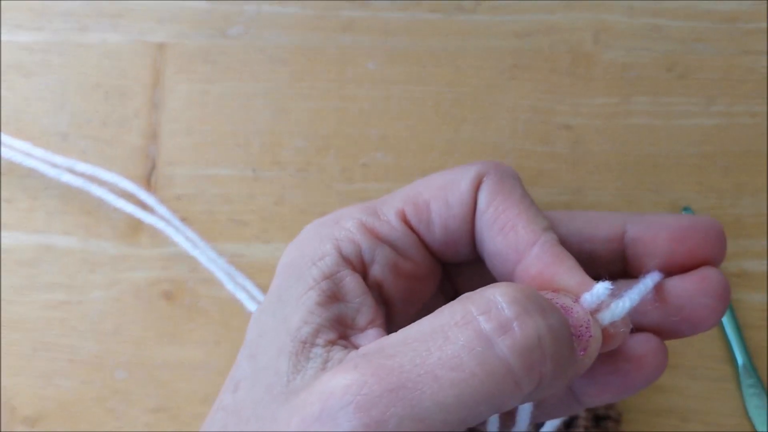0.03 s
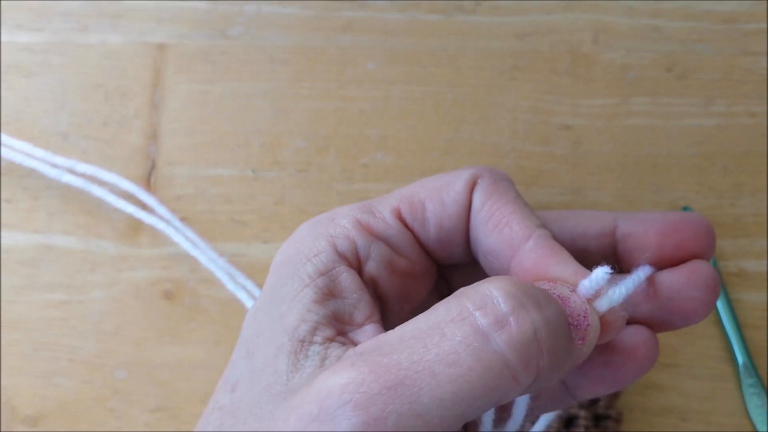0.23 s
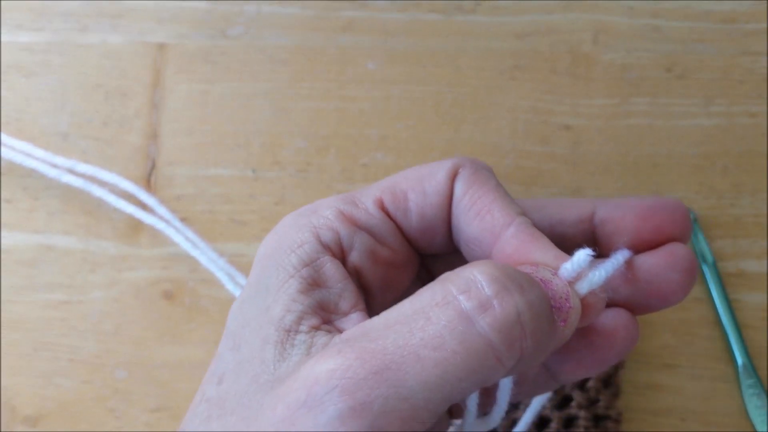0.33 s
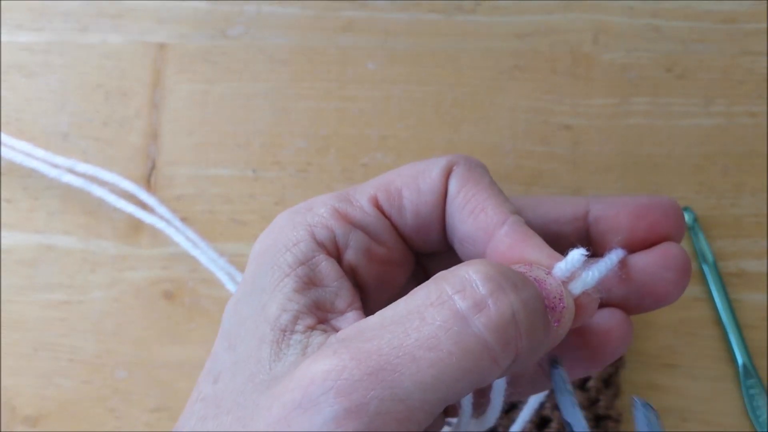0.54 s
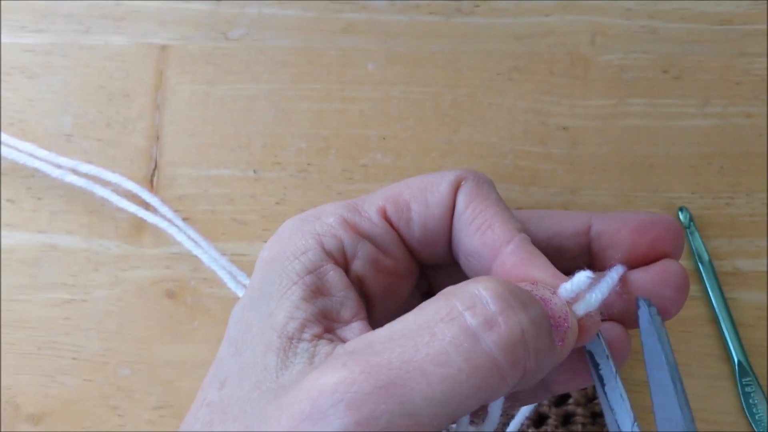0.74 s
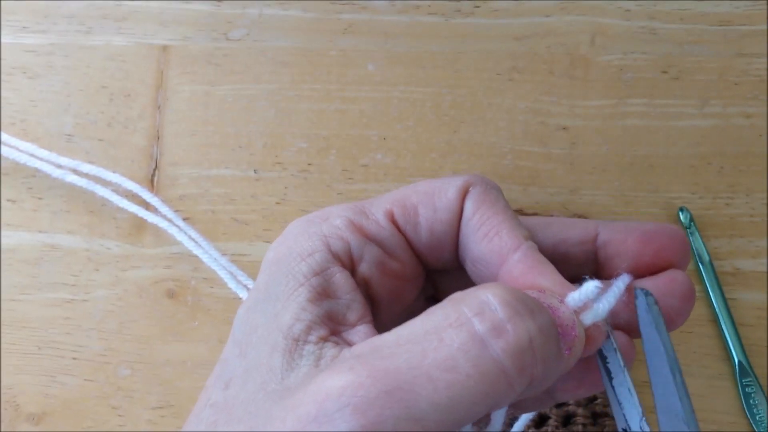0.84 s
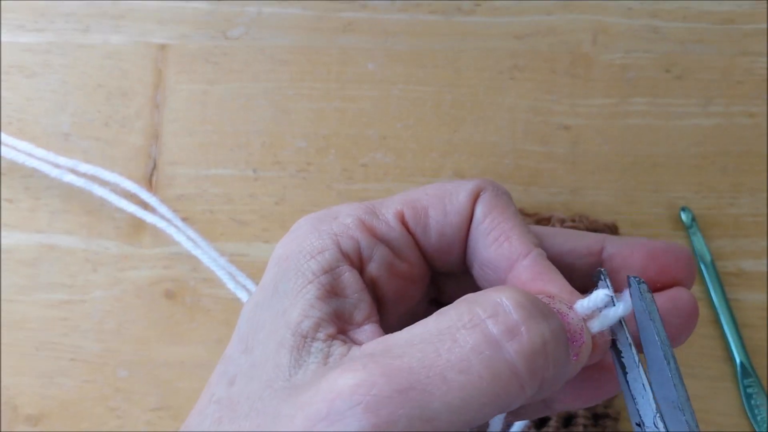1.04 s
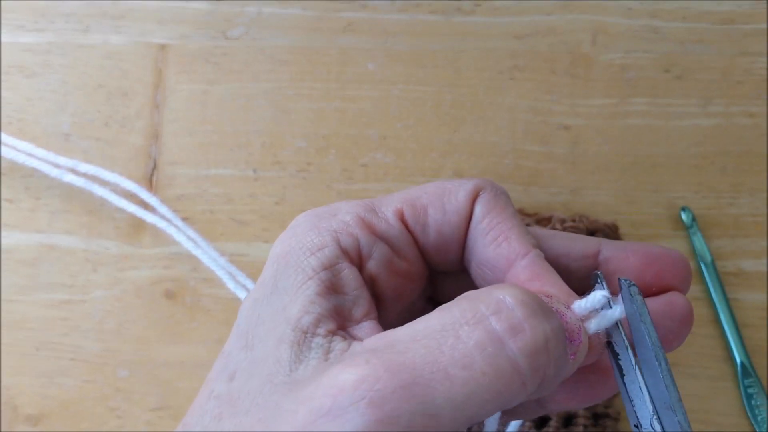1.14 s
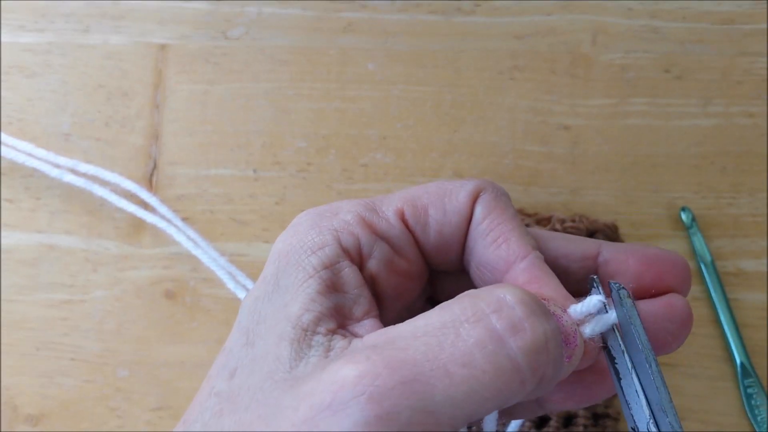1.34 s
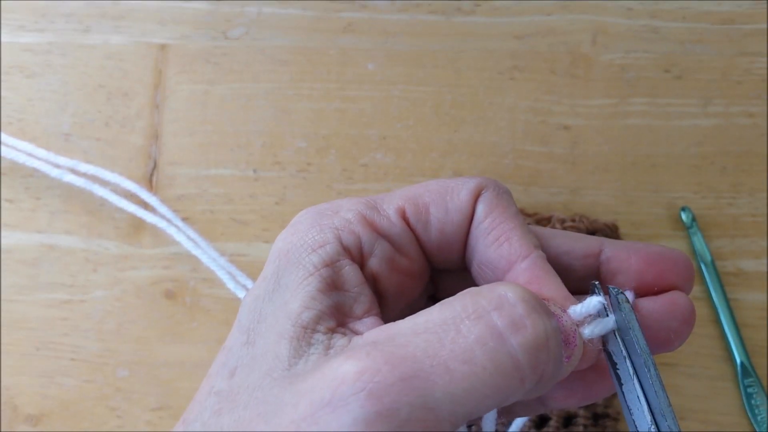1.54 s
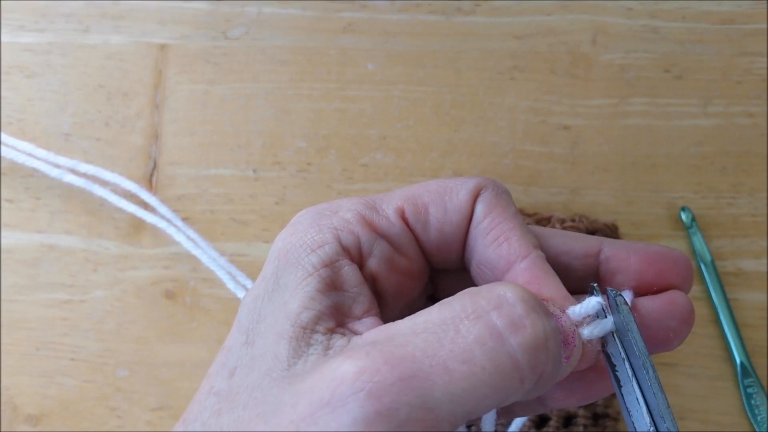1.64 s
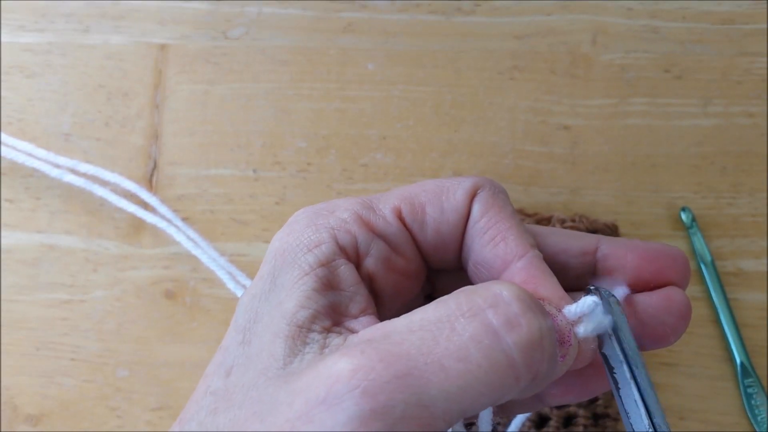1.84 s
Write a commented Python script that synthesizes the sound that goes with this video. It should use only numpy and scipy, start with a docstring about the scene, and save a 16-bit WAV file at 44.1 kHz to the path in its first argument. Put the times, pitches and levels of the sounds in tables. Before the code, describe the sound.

Scissors lifted from a wooden table: a soft rub and tiny tick, then a loud woody, metallic knock at 0.2 seconds, ringing briefly in a small room. A bright blade tick follows at 0.4, a short steely slide at 0.5. Quiet until a small click at 1.47, a barely audible scrape at 1.76 and a faint dry yarn crunch at 1.88. Low hum and faint hiss throughout, close microphone.

```python
"""In a small, quiet room, close to the microphone, steel scissors are taken up from a wooden table.
They knock once: broadband contacts excite decaying modes of table and blades, and the diffuse room.
The blades slide open (stick-slip noise), tick (echoed impulses) and start to bite into yarn (a noise pulse).
A low room hum and a faint hiss, both filtered noise, run throughout."""
import sys
import numpy as np
from scipy import signal
from scipy.fft import rfft, irfft
from scipy.io import wavfile

SR = 44100
rng = np.random.default_rng(int(sys.argv[2]) if len(sys.argv) > 2 else 0)


def unload_audio(sound):
    """Save the sound as a 16-bit wav file, at the path given as the first command line argument."""
    columns = np.transpose(np.atleast_2d(sound))
    # keep every value between -1 and 1, then stretch to whole-number steps
    steps = np.round(np.clip(columns, -1, 1) * 32767)
    wavfile.write(sys.argv[1], SR, steps.astype(np.int16))


N = 83790  # samples, 1.9 s


def undb(db):
    """Amplitude ratio of a level in decibels."""
    return 10 ** (np.asarray(db) / 20)


def gains(points):
    """Spectral envelope: gain at each FFT bin, interpolated in dB over log frequency."""
    hz, db = np.array(points, float).T
    bin_hz = np.arange(N + 1) * SR / (2 * N)
    return undb(np.interp(np.log(bin_hz + 1), np.log(hz), db))


def colour(x, gain):
    """Minimum-phase filtering: folding the cepstrum makes a gain curve causal."""
    cepstrum = irfft(np.log(gain))
    cepstrum[1:N] *= 2
    cepstrum[N + 1:] = 0
    response = np.exp(rfft(cepstrum))
    return irfft(rfft(x, 2 * N) * response)[..., :N]


def shaped(x, points):
    """Source-filter principle: colour a sound, keeping the power that white noise would have."""
    gain = gains(points)
    return colour(x, gain / np.sqrt(np.mean(gain ** 2)))


def convolve(x, response):
    """Linear superposition: each sample of the sound launches a copy of the response."""
    return signal.fftconvolve(np.atleast_2d(x), response, axes=-1)[:, :N]


def diffuse(wide_hz):
    """Diffuse-field coherence: stereo noise, alike in the bass and unrelated well above wide_hz."""
    hz = np.fft.rfftfreq(N, 1 / SR)
    alike = 1 / (1 + (hz / wide_hz) ** 4)
    mid, side = rfft(rng.standard_normal((2, N)))
    mid = mid * np.sqrt((1 + alike) / 2)
    side = side * np.sqrt((1 - alike) / 2)
    return irfft(np.array([mid + side, mid - side]), N)


def pan(db):
    """Interchannel level difference: gains that set left minus right to db."""
    return undb(np.array([[db], [-db]]) / 2)


def fade(t60, rise_s):
    """Exponential decay by 60 dB in t60 seconds, after an exponential rise."""
    t = np.arange(N) / SR
    return (1 - np.exp(-t / rise_s)) * np.exp(-np.log(1000) * t / t60)


def room(t60, treble_t60):
    """Diffuse reverberation: decaying noise of unit energy, split at 3 kHz into two decay times."""
    wide_hz, rise_s = 790, 0.0013
    noise = diffuse(wide_hz)
    low = signal.sosfiltfilt(signal.butter(2, 3000, fs=SR, output="sos"), noise)
    tail = low * fade(t60, rise_s) + (noise - low) * fade(treble_t60, rise_s)
    return tail / np.sqrt(np.sum(tail ** 2) / 2)


def impulses(rows, start=0):
    """Ideal impulsive excitation: one sample for each (s, dB) row."""
    out = np.zeros(N)
    for s, db in rows:
        out[int(np.clip((start + s) * SR, 0, N - 1))] += undb(db)
    return out


# left minus right level of the scissors: frequency_hz, difference_db
SCISSORS_LEAN = [(100, 6.5), (400, -0.5), (1300, 1), (2400, 2), (4400, 0.5), (7000, 10.5), (9500, 3),
                 (14000, -9.5)]


def leaning(x):
    """Frequency-dependent level difference: mostly louder left, chiefly near 7 kHz; the very top leans right."""
    gain = np.sqrt(gains(SCISSORS_LEAN))  # half the difference on each side
    return np.array([colour(x[0], gain), colour(x[1], 1 / gain)])


def ports(x):
    """Interchannel time difference: a sound from the left reaches the right microphone later."""
    lag_s = 0.00023
    t = np.arange(N) / SR
    return np.array([x, np.interp(t - lag_s, t, x)])


# spectrum of the room hum: frequency_hz, relative_db_per_hz
HUM_SPECTRUM = [(25, -34), (42, -30), (55, 1.5), (70, -9.5), (90, 5.5), (130, -3.5), (185, -2.5),
                (225, -10), (280, 0.5), (365, -1), (450, -10.5), (600, -22), (1200, -21), (2000, -33.5),
                (4000, -28), (16000, -30.5)]
# level of the hum over time, added to HUM_DB: time_s, level_db
HUM_COURSE = [(0, 3.5), (.4, 3.5), (.75, 4), (.9, 1), (1.2, 2), (1.45, 0.5), (1.6, -2.5), (1.72, 2),
              (1.9, 3)]
# spectrum of the hiss: frequency_hz, relative_db_per_hz
HISS_SPECTRUM = [(500, 9), (3000, -3.5), (6000, -5), (9300, 0.5), (9750, -3.5), (10000, 8.5), (10300, -1),
                 (13000, -4), (16000, -2)]
# level of the hiss over time, added to HISS_DB: time_s, level_db
HISS_COURSE = [(0, -0.5), (.2, 2.5), (.36, 6), (.62, 1.5), (.9, 0.5), (1.43, 0), (1.62, -1), (1.8, 0)]
HUM_DB, HUM_PAN_DB, HUM_WIDE_HZ, HUM_WAVER_DB = -60, 3, 1130, 0.5
HISS_DB, HISS_PAN_DB = -65.5, -5


def background():
    """Stationary filtered noise, slowly modulated: a wavering low room hum under faint hiss."""
    t = np.arange(N) / SR
    waver = np.interp(t, np.linspace(0, t[-1], 40), rng.standard_normal(40))
    hum_db = HUM_DB + np.interp(t, *np.array(HUM_COURSE).T) + HUM_WAVER_DB * waver
    hum = shaped(diffuse(HUM_WIDE_HZ), HUM_SPECTRUM) * undb(hum_db) * pan(HUM_PAN_DB)
    hiss_db = HISS_DB + np.interp(t, *np.array(HISS_COURSE).T)
    hiss = shaped(rng.standard_normal((2, N)), HISS_SPECTRUM) * undb(hiss_db) * pan(HISS_PAN_DB)
    return hum + hiss


def brush():
    """Resonance excited by noise: a soft, hollow rub just before the knock."""
    peak_s, length_s, level_db, pitch_hz, width_hz = .162, .025, -65, 750, 130
    t = np.arange(N) / SR
    resonance = signal.iirpeak(pitch_hz, pitch_hz / width_hz, fs=SR)
    band = signal.lfilter(*resonance, rng.standard_normal(N))
    swell = np.exp(-((t - peak_s) / length_s) ** 2)
    return band / np.std(band) * undb(level_db) * swell


# light ticks of the blades: start_s, level_db, room_db (relative to the tick)
BLADE_TICKS = [(0.1948, -30, -4), (0.3993, -27.5, -10), (1.468, -27.5, -3)]
# spectrum of a tick: frequency_hz, relative_db
TICK_SPECTRUM = [(1000, -32), (3000, -19), (6300, -21), (7900, -2), (9200, 1), (11000, -11.5), (16000, -26)]
TICK_T60_S, TABLE_ECHO_S, TABLE_ECHO_DB = 0.16, 0.0018, -10


def click(rows):
    """Image source: each impulse is followed by its reflection in the table top."""
    echo = undb(TABLE_ECHO_DB) * impulses(rows, TABLE_ECHO_S)
    return shaped(impulses(rows) + echo, TICK_SPECTRUM)


def ticks():
    """Direct and reverberant field: small bright clicks, each with its own share of room."""
    direct = click([(s, db) for s, db, room_db in BLADE_TICKS])
    sent = click([(s, db + room_db) for s, db, room_db in BLADE_TICKS])
    return leaning(direct + convolve(sent, room(TICK_T60_S, TICK_T60_S)))


# spectrum of the wooden thump: frequency_hz, relative_db
THUMP_SPECTRUM = [(40, -29), (110, -4), (250, -9), (700, 5.5), (1100, -6.5), (2000, -41), (5000, -44),
                  (16000, -15)]
# contacts (first touch, blow, rattle): start_s (from the knock), level_db (added to CRACK_DB)
KNOCK_CONTACTS = [(-0.0020, -13), (0.0001, -23), (0.0007, -0.5), (0.0160, -9)]
# spectrum of a contact: frequency_hz, relative_db
CRACK_SPECTRUM = [(100, -20), (300, -20), (700, -21), (1400, 6), (1900, -16), (2280, 7), (2800, -26),
                  (3700, 2.5), (4400, 2), (5100, -3.5), (6100, 5.5), (7800, 2.5), (8800, -11), (9600, 2),
                  (11500, -21.5), (16000, -47)]
# modes of table and scissors: pitch_hz, level_db (added to RING_DB), t60_s (before late damping)
RING_MODES = [(193.8, -34.5, 0.33), (248.6, -22.5, .3), (402.2, -30.5, 0.24), (511.4, -42, 0.37),
              (537, -29, 0.2), (643, -44, 0.16), (726, -30, 0.18), (1157, -42.5, 0.36), (1290, -36, 0.24),
              (1460, -37, 0.32), (1605, -39, 0.23), (1781, -38, 0.32), (2294, -20, 0.19), (3558, -32, 0.22),
              (3660, -27, 0.12)]
# spectrum of the knock as the room returns it: frequency_hz, relative_db
KNOCK_ROOM_SPECTRUM = [(40, -62), (120, -9), (200, -8), (400, -1.5), (700, -2), (1000, -3.5), (1450, 1.5),
                       (1780, -1), (1950, -13.5), (2300, 5), (2800, -9), (3100, -5.5), (3280, -14),
                       (3600, 1.5), (4200, -6.5), (5200, -12), (6300, -8), (8000, -17), (9600, -16.5),
                       (11500, -24), (16000, -47)]
KNOCK_S, THUMP_DB = 0.208, -4
CRACK_DB, CRACK_PAN_DB, CRACK_T60_S, CRACK_RISE_S, CRACK_WIDE_HZ = -1, 5, 0.0086, .0001, 1170
RING_DB, RING_RISE_S = 2, 0.025
BOOM_HZ, BOOM_DB, BOOM_T60_S, BOOM_RISE_S = 89.2, -26.5, 0.47, 0.36
# decay times before late damping
KNOCK_ROOM_DB, KNOCK_T60_S, KNOCK_TREBLE_T60_S = 3, 0.32, 0.29
DAMPED_AFTER_S, DAMP_STEEPNESS = 0.22, 6


def knock():
    """Impact and modal decay: wood thumps, steel cracks, both ring on; a low room resonance builds up."""
    t = np.arange(N) / SR
    blow = impulses([(KNOCK_S, 0)])
    thump = ports(shaped(blow, THUMP_SPECTRUM)) * undb(THUMP_DB)

    # the contacts add in power; noise gives each sample its sign
    burst = fade(CRACK_T60_S, CRACK_RISE_S) ** 2
    burst = np.atleast_2d(burst / burst.sum())
    power = np.abs(convolve(impulses(KNOCK_CONTACTS, KNOCK_S) ** 2, burst))
    crack = shaped(np.sqrt(power) * np.sign(diffuse(CRACK_WIDE_HZ)), CRACK_SPECTRUM)
    crack = crack * undb(CRACK_DB) * pan(CRACK_PAN_DB)

    ring = np.zeros(N)
    for hz, db, t60 in RING_MODES:
        ring += undb(RING_DB + db) * np.sin(2 * np.pi * hz * t) * fade(t60, RING_RISE_S)
    boom = undb(BOOM_DB) * np.sin(2 * np.pi * BOOM_HZ * t) * fade(BOOM_T60_S, BOOM_RISE_S)
    tail = shaped(room(KNOCK_T60_S, KNOCK_TREBLE_T60_S), KNOCK_ROOM_SPECTRUM) * undb(KNOCK_ROOM_DB)

    # ring and room tail die away faster towards their end
    damped = 1 / np.sqrt(1 + (t / DAMPED_AFTER_S) ** DAMP_STEEPNESS)
    response = (tail + ports(ring)) * damped + ports(boom)
    return thump + crack + leaning(convolve(blow, response))


# blades sliding over each other: peak_s, level_db, rise_s, fall_s
BLADE_SLIDES = [(0.499, -61, 0.0097, 0.03), (0.5211, -35, 0.0024, .0022), (1.760, -66.5, 0.0068, 0.018)]
# spectrum of the sliding blades: frequency_hz, relative_db
BLADE_SPECTRUM = [(1000, -28), (2200, -42), (3150, -4), (4200, -13), (5150, 2), (6300, -11.5), (7200, 4),
                  (8200, 0), (9200, -2.5), (10500, -4), (13000, -17), (16000, -11)]
# spectrum of the slide sent to the room: frequency_hz, relative_db
BLADE_ROOM_SPECTRUM = [(1000, -6), (2200, -12.5), (3100, 1.5), (4300, -9), (5100, 0), (6300, -9),
                       (7200, -5.5), (9000, 3.5), (10500, -6), (13000, -9), (16000, -21)]
SLIDE_GRAINS_PER_S, SLIDE_ROOM_DB, SLIDE_T60_S = 25300, -3.5, 0.21


def slides():
    """Stick-slip friction: edge on edge, a short swell of tiny slips rings the blades and the room."""
    t = np.arange(N) / SR
    force = np.zeros(N)
    for s, db, rise, fall in BLADE_SLIDES:
        force += undb(db) * np.exp(-np.maximum((s - t) / rise, (t - s) / fall))
    share = min(SLIDE_GRAINS_PER_S / SR, 1)  # chance of a slip in each sample
    slipping = rng.random((2, N)) < share
    slips = force * slipping * rng.standard_normal((2, N)) / np.sqrt(share)
    tail = convolve(shaped(slips, BLADE_ROOM_SPECTRUM), room(SLIDE_T60_S, SLIDE_T60_S))
    return leaning(shaped(slips, BLADE_SPECTRUM) + undb(SLIDE_ROOM_DB) * tail)


# spectrum of the bite into the yarn: frequency_hz, relative_db
BITE_SPECTRUM = [(1000, -16), (2400, -1), (3000, 5.5), (4200, -12.5), (7000, 1), (9200, 3), (11500, -1),
                 (16000, -8)]


def bite():
    """Force-modulated noise: the edges first catch the yarn with a tiny dry crunch."""
    peak_s, level_db, rise_s, fall_s = 1.879, -47.5, 0.0022, 0.018
    t = np.arange(N) / SR
    force = undb(level_db) * np.exp(-np.maximum((peak_s - t) / rise_s, (t - peak_s) / fall_s))
    return shaped(force * rng.standard_normal((2, N)), BITE_SPECTRUM)


def scene():
    """Superposition: all sounds at the table add."""
    return background() + brush() + ticks() + knock() + slides() + bite()


def record(dry):
    """Band limiting: a steep elliptic low-pass cuts the top of the spectrum."""
    top_hz = 15850
    return signal.sosfilt(signal.ellip(10, .2, 70, top_hz, fs=SR, output="sos"), dry)


dry = scene()
out = record(dry)
unload_audio(out)
```